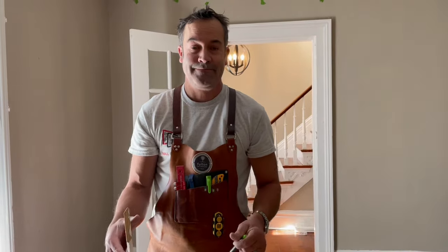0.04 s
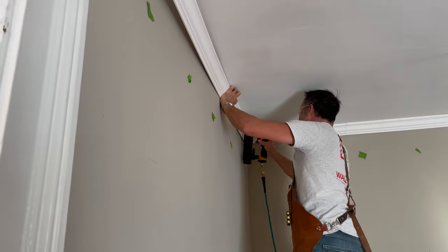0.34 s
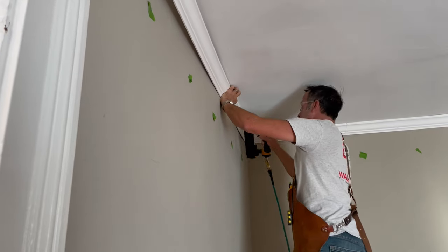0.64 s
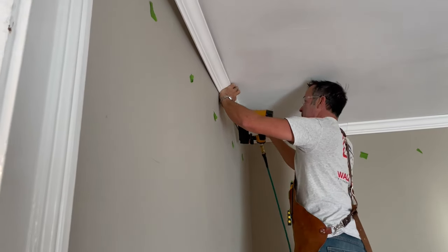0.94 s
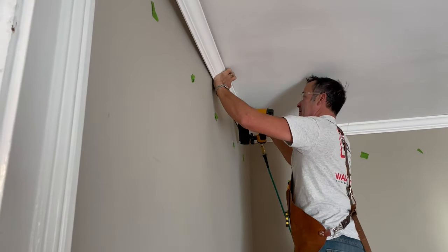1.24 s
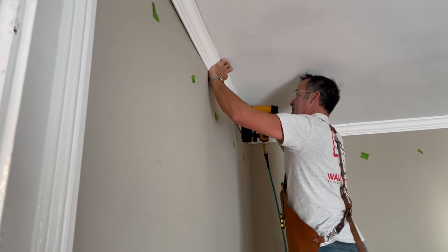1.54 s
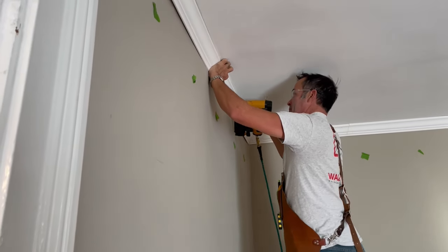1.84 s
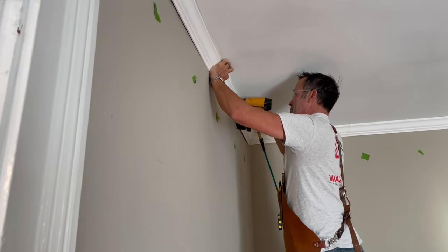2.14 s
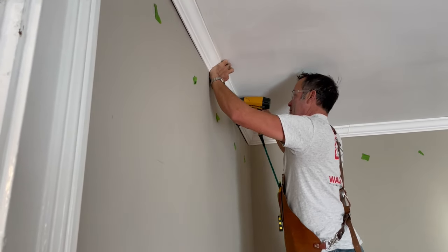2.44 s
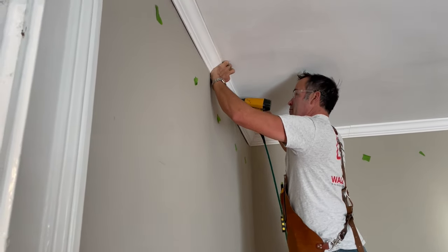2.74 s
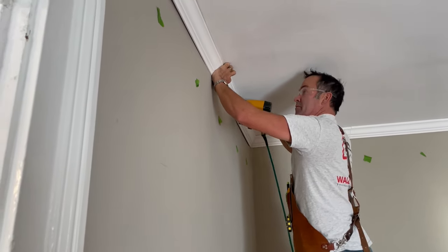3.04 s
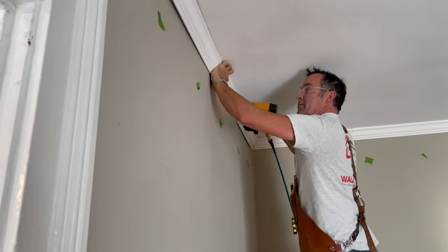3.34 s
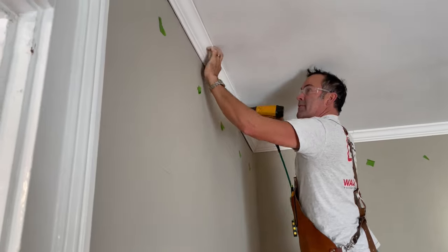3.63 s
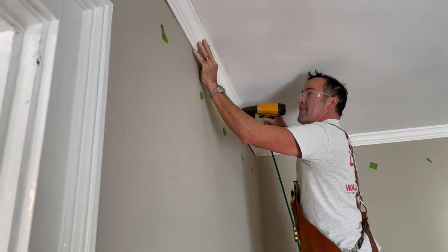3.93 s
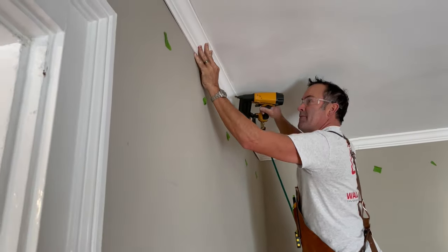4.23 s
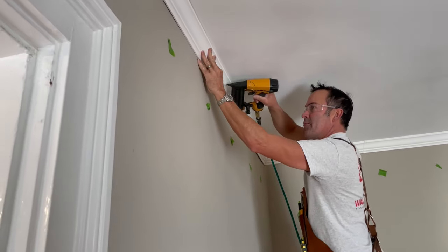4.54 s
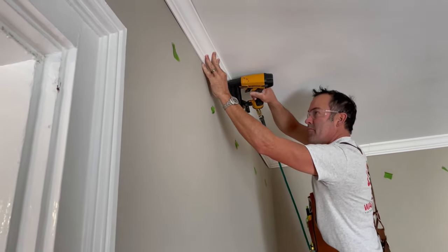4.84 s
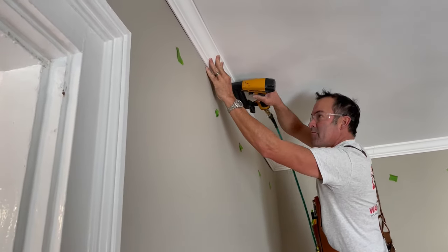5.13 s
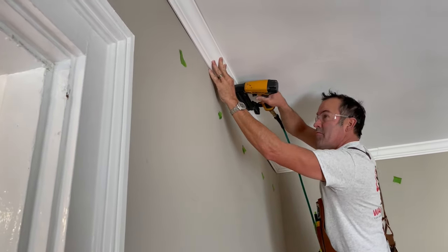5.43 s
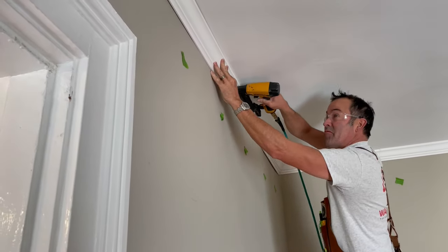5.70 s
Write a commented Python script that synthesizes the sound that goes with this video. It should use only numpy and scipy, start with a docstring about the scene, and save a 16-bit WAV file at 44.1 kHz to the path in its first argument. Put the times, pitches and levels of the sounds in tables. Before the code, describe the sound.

A pneumatic nail gun fires three sharp shots in an echoing room, with wooden knocks and small metal clicks between them.

```python
"""A bare, echoing room, where a pneumatic nail gun fixes crown moulding over a low building rumble.
Three shots: air slams the piston down, the driver hits the nail, the piston clacks back with a puff.
Between shots the trim is knocked into place, fittings click, the gun's nose scrapes along the wood
and air hisses back through the hose. A gain control ducks each shot and swells back during its echo."""
import sys
import numpy as np
from scipy import signal
from scipy.fft import rfft, irfft, next_fast_len
from scipy.io import wavfile
from scipy.ndimage import uniform_filter1d, minimum_filter1d, map_coordinates

SR = 44100
rng = np.random.default_rng(int(sys.argv[2]) if len(sys.argv) > 2 else 0)


def log_audio(samples):
    """Write samples as a 16-bit WAV file to the path given in sys.argv[1]."""
    # one column per channel
    frames = np.atleast_2d(samples).T
    # limit to full scale, then quantise
    limited = np.clip(frames, -1, 1)
    pcm = np.round(limited * 32767).astype(np.int16)
    wavfile.write(sys.argv[1], SR, pcm)


N = 254368
LENGTH = 65536  # samples in one hit, tail included
T, HZ = np.arange(LENGTH) / SR, np.fft.rfftfreq(LENGTH, 1 / SR)
# the bright crack of escaping air: f/Hz, level/dB
CRACK_SPECTRUM = [(300, -20), (1500, 0.5), (3500, -6), (7000, -7), (11000, 3), (16000, -1)]


def amp(db):
    """Decibels to gain."""
    return 10 ** (np.asarray(db) / 20)


def unit(x):
    """Scale to rms 1."""
    return x / np.sqrt(np.mean(np.abs(x) ** 2) + 1e-20)


def along(points, hz):
    """Read a curve of (f/Hz, value) points on a log frequency axis."""
    freqs, values = np.transpose(points)
    return np.interp(np.log(hz + 1), np.log(freqs), values)


def add(track, s, sound):
    """Mix a stereo sound into the track at s seconds."""
    part = track[:, max(round(s * SR), 0):][:, :sound.shape[1]]
    part += sound[:, :part.shape[1]]


def filtered(x, response):
    """Filter x by a gain given as a function of frequency."""
    size = next_fast_len(x.shape[-1] + 4096, real=True)
    return irfft(rfft(x, size) * response(np.fft.rfftfreq(size, 1 / SR)), size)[..., :x.shape[-1]]


def shape(points):
    """An EQ curve that keeps white noise at rms 1."""
    return unit(amp(along(points, HZ)))


def coloured(x, gain):
    """Minimum-phase EQ, so that attacks stay sharp."""
    cepstrum = irfft(np.log(np.maximum(gain, 1e-6)))
    cepstrum[1:LENGTH // 2] *= 2
    cepstrum[LENGTH // 2 + 1:] = 0
    return irfft(rfft(x) * np.exp(rfft(cepstrum)))


def resonance(hz, centre_hz, quality):
    """Gain of one resonance, 1 at its centre."""
    return 1 / np.hypot(1, quality * ((hz + 1) / centre_hz - centre_hz / (hz + 1)))


def fade(t60):
    """Exponential decay by 60 dB in t60 seconds."""
    return np.exp(-np.log(1000) * T / t60)


def attack(build_s):
    """A soft onset with time constant build_s."""
    return 1 - np.exp(-T / build_s)


def burst(t60):
    """A short crack of noise."""
    return rng.standard_normal(LENGTH) * fade(t60)


def glide(start_hz, end_hz, fall_s):
    """A tone whose pitch falls: high bending waves outrun low ones."""
    return np.sin(2 * np.pi * np.cumsum(end_hz + (start_hz - end_hz) * np.exp(-T / fall_s)) / SR)


def swells(cues, rise, sag, release):
    """Envelope of events that rise, sag while they last and die away; slopes in dB/s."""
    t = np.arange(N) / SR
    return sum(amp(db - rise * np.maximum(s - t, 0)
                   - sag * np.clip(t - s, 0, length)
                   - release * np.maximum(t - s - length, 0)) for s, db, length in cues)


def direct(x):
    """Sound straight from the work reaches the left side 34 microseconds late."""
    return filtered(x, lambda hz: np.array([np.exp(-2j * np.pi * hz * 34e-6), np.ones_like(hz)]))


def diffuse(size):
    """White noise from all sides: near mono in the bass, wide above."""
    # likeness of left and right in the room: f/Hz, correlation
    likeness = [(60, 0.97), (130, 0.97), (290, 0.8), (640, 0.0086), (1400, 0.076), (3100, 0.31), (7000, 0),
                (15000, 0)]

    def mid_side(hz):
        angle = np.arccos(np.clip(along(likeness, hz), -1, 1)) / 2
        return np.array([np.cos(angle), np.sin(angle)])

    mid, side = filtered(rng.standard_normal((2, size)), mid_side)
    return np.array([mid + side, mid - side])


def echo(build_s):
    """A fresh room tail that builds up, then dies fastest in the treble."""
    # reverb time of the bare room: f/Hz, t60/s
    reverb_times = [(60, 0.84), (130, 0.5), (250, 0.95), (700, 1), (1500, 0.9517), (3000, 0.8358),
                    (6000, 0.7), (10000, .5), (15000, 0.42)]
    hz, t, spectra = signal.stft(diffuse(LENGTH), SR, nperseg=512)
    decay = np.exp(-np.log(1000) * t / along(reverb_times, hz)[:, None])
    tail = signal.istft(spectra * decay, SR, nperseg=512)[1]
    return tail[:, :LENGTH] * attack(build_s)


def building_rumble():
    """The building's low bed of noise, steady but for a slow wander in level."""
    # rumble spectrum: f/Hz, level/dB
    spectrum = [(20, -24.5), (48, -3.5), (62, -8.5), (83, -2.5), (110, -12), (160, -11), (300, -13),
                (600, -15), (1300, -23), (2500, -36), (5000, -49), (15000, -57)]
    level_db, wander_db, wanders_per_s = -53, 0.44, 2.7
    knots = np.arange(N) * wanders_per_s / SR
    wander = map_coordinates(rng.standard_normal(64), [knots], mode="mirror")
    rumble = unit(filtered(diffuse(N), lambda hz: amp(along(spectrum, hz))))
    return amp(level_db + wander_db * wander) * rumble


def nose_slide():
    """A faint scrape along the trim, sung by one resonance of the gun's nose."""
    # slides: t/s at full speed, level/dB, length/s
    cues = [(3.5, -62.5, 0.54), (4.3, -71, 0.2)]
    scrape = unit(filtered(diffuse(N), lambda hz: resonance(hz, centre_hz=3670, quality=8.3)))
    return swells(cues, rise=100, sag=14, release=85) * scrape


def hose_refill():
    """The hose recharges the gun: a soft hiss opens, sags as the pressure evens out, then shuts."""
    # refills: t/s at full flow, level/dB, length/s
    cues = [(.855, -42, 0.38), (3.49, -46, 0.2)]
    # air in the hose: f/Hz, level/dB
    spectrum = [(200, -1), (500, -1), (800, 5.5), (1100, 6), (1500, 12.5), (2500, 4), (4000, 0.5),
                (7000, -5.5), (11000, -5.5), (14000, -13.5), (16000, -13)]
    hiss = unit(filtered(diffuse(N), lambda hz: amp(along(spectrum, hz))))
    return swells(cues, rise=98, sag=11, release=62) * hiss


def metal_clicks():
    """The trigger and fittings make small metal contacts: a midrange ring and a thin snap."""
    # clicks: t/s, ring/dB, snap/dB
    cues = [(0.079, -44.5, -64), (1.912, -29.5, -44.5), (2.207, -44, -40.5), (2.277, -32.5, -45),
            (2.2969, -18, -56.5), (3.168, -50, -32), (3.931, -48, -57), (3.945, -51.5, -51),
            (4.512, -63.5, -65), (4.733, -30, -44.5), (5.007, -55, -57), (5.256, -60, -69)]
    ring = shape([(400, -30), (1500, 4.5), (2700, -2), (3400, -4), (4200, -15.5),
                  (9000, -27.5), (16000, -32)])
    snap = shape([(1500, -24), (6000, -3.5), (11000, -0.5), (16000, -11)])
    out = np.zeros((2, N))
    for s, ring_db, snap_db in cues:
        contact = amp(-2.5) * direct(burst(t60=0.031)) + amp(-16) * echo(build_s=0.0022)
        add(out, s, coloured(contact, amp(ring_db) * ring + amp(snap_db) * snap))
    return out


def bending_wave(delay_s):
    """A sharp blow smeared by the wall: low bending waves arrive last (delay_s holds at 1 kHz)."""
    travel_cycles = 2 * delay_s * np.sqrt(1000 * HZ)
    return irfft(np.exp(-2j * np.pi * travel_cycles)) * (T < T[-1] / 2)


def wood_ring():
    """Trim and wall ring on, with fresh strengths and phases for every knock."""
    # modes of the trim and wall: f/Hz, level/dB, t60/s
    modes = [(135.7, -5.5, 2), (296, 5, 0.27), (319, 5, 0.73), (386, -0.5, 1.5), (492, 3, 0.29),
             (586, -13, 3.3), (723, -9, 2.2), (815, -3.5, 0.6), (940, -1.5, 0.72)]
    ring = np.zeros((2, LENGTH))
    for hz, db, t60 in modes:
        envelope = amp(db + rng.normal(0, 1.6)) * fade(t60)
        phase = rng.random() + min(hz / 2000, 1) * rng.random((2, 1))  # higher modes spread wider
        ring += envelope * np.sin(2 * np.pi * (hz * T + phase))
    return ring * attack(build_s=0.0086)


def trim_knocks():
    """Fist and gun nose bump the trim: soft blows are dull, hard ones bright."""
    # knocks: t/s, level/dB, hardness/dB, f/Hz of the struck spot
    cues = [(1.304, -39.5, 5, 1080), (1.545, -16.5, 3.5, 300), (1.574, -15.5, -11.5, 790),
            (2.129, -24, 2.5, 294), (2.208, -24, -10, 1370), (2.296, -26.5, -9, 1700),
            (2.311, -43, -19.5, 136.2), (2.7284, -27.5, 2.5, 302), (3.624, -39.5, -14, 283),
            (4.018, -35.5, -1.5, 285), (4.347, -42.5, -2.5, 288.6), (4.656, -62.5, -33, 301),
            (4.722, -35, -4, 582), (4.733, -26, 4, 1540), (4.795, -25.5, -4.5, 1090)]
    # tone of the struck trim: f/Hz, level/dB
    trim_spectrum = [(29, -37.5), (50, -6), (75, 2.5), (165, -4), (314, -2.5), (494, 0), (643, -9),
                     (856, -4), (1750, -13), (2450, -18.5), (3670, -32.5), (5910, -40), (8460, -45.5),
                     (10700, -52.5), (15000, -59.5)]
    open_span_hz, spot_boost_db = 280, 14
    above_bass, treble = (1 / (1 + (edge_hz / (HZ + 1)) ** 6) for edge_hz in (600, 3000))
    bands = [1 - above_bass, above_bass * (1 - treble), treble]
    out = np.zeros((2, N))
    for s, level_db, hard_db, spot_hz in cues:
        # stiff spots ring higher, thinner and drier than the open span
        octaves = np.log2(spot_hz / open_span_hz)
        bass_db = level_db - 1 - 5 * octaves - 0.38 * hard_db
        treble_db = level_db - 16 + hard_db
        room_db = -3 - 3.5 * octaves
        spot = shape(trim_spectrum) * (1 + amp(spot_boost_db) * resonance(HZ, spot_hz, quality=2.1))
        colour = sum(amp(db) * unit(spot * band)
                     for db, band in zip((bass_db, level_db, treble_db), bands))
        contact = amp(16) * bending_wave(delay_s=0.0017) + amp(-2.5) * burst(t60=0.091)
        blow = direct(contact) + amp(room_db) * echo(build_s=0.0094)
        hollow = amp(bass_db + room_db - 8.5) * wood_ring()
        snap = amp(treble_db - 1.5) * direct(coloured(burst(t60=0.002), shape(CRACK_SPECTRUM)))
        add(out, s, coloured(blow, colour) + hollow + snap)
    return out


def piston_return(metal, clack_db, vent_db):
    """The piston rattles home, the room answers and the spent air puffs out."""
    # piston bounces: delay/s, level/dB
    bounces = [(0, -1), (.0065, 1.5), (0.014, -4.5)]
    # spectra of the clack and of the vented air: f/Hz, level/dB
    clack_spectrum = [(40, -9.5), (130, 3.5), (220, -4.5), (500, -5.5), (1000, -2.5), (1700, 0), (2600, -3),
                      (4000, -13), (8000, -17), (16000, -19)]
    vent_spectrum = [(300, -42), (1500, 11), (3500, -12.5), (7000, 1.5), (11000, 8), (14000, -12.5),
                     (16000, -2)]
    rattle = np.zeros((2, LENGTH))
    for delay_s, db in bounces:
        add(rattle, delay_s, amp(db - 20) * coloured(direct(burst(t60=0.017)), shape(clack_spectrum)))
    room = amp(-26) * coloured(echo(build_s=0.0052), shape(clack_spectrum) * metal)
    puff = amp(-24) * coloured(echo(build_s=0.035) * fade(0.45), shape(vent_spectrum))
    return amp(clack_db) * rattle + amp(vent_db) * (room + puff)


def air_charge(thump_db):
    """The charge fires: a falling thump under a spit of air."""
    thump = amp(thump_db - 5.5) * glide(start_hz=1098, end_hz=128.5, fall_s=0.0025) * fade(0.056)
    spit = amp(-11.5) * coloured(burst(t60=0.079), shape(CRACK_SPECTRUM))
    return direct(thump + spit)


def driver_strike(metal, recoil_db, room_db):
    """The driver hits the nail: the gun clangs and kicks, and the whole room is set ringing."""
    # the blast in the room: f/Hz, level/dB
    blast_spectrum = [(35, -14), (75, -2), (110, -8.5), (160, -9), (450, -1.5), (800, -4), (1150, -5),
                      (1480, -1), (1900, -4), (2800, -9.5), (3500, -8.5), (5000, -14.5), (8000, -18.5),
                      (12000, -19.5), (16000, -29.5)]
    strike = amp(-2) * glide(start_hz=4790, end_hz=1387, fall_s=0.00079) * fade(0.032)
    crack = amp(-3.5) * coloured(burst(t60=0.0073), shape(CRACK_SPECTRUM))
    kick = glide(start_hz=160, end_hz=61.5, fall_s=0.0065)
    recoil = amp(recoil_db) * kick * fade(0.031) * attack(build_s=0.002)
    room = amp(room_db - 22) * coloured(echo(build_s=0.001), shape(blast_spectrum) * metal)
    exhaust = amp(-32) * coloured(echo(build_s=0.004) * fade(0.35), shape(CRACK_SPECTRUM))
    clang = amp(-24) * coloured(burst(t60=0.09), unit((metal - 1) ** 2))
    return direct(strike + crack + clang + recoil) + room + exhaust


def nail_gun():
    """Each shot is three hits: the air charge, the driver milliseconds later, the piston's return."""
    # shots: t/s, level/dB, thump/dB, recoil/dB, driver delay/s, room/dB, return t/s, clack/dB, vent/dB
    cues = [(.097, 17.5, -15.5, -16, 0.0068, -2.5, .2067, 4, 1.6),
            (2.766, 12.5, 2.5, -14, .0071, 5.5, 2.889, 6, 1),
            (5.4875, 1, 2, -3.5, .0079, 2.2, 5.616, 1.5, 1.5)]
    # resonances of the gun's metal body: f/Hz, quality, level/dB
    body_modes = [(1450, 14, -4), (2211, 60, -5), (3400, 45, -4), (3965, 90, -4), (4126, 90, -5),
                  (4680, 90, -4)]
    metal = 1 + sum(amp(db) * resonance(HZ, hz, quality) for hz, quality, db in body_modes)
    out = np.zeros((2, N))
    for s, db, thump_db, recoil_db, delay_s, room_db, return_s, clack_db, vent_db in cues:
        add(out, s, amp(db) * air_charge(thump_db))
        add(out, s + delay_s, amp(db) * driver_strike(metal, recoil_db, room_db))
        add(out, return_s, amp(db) * piston_return(metal, clack_db, vent_db))
    return out


def scene():
    """All the work sits a little to the right."""
    # stereo balance: f/Hz, left minus right/dB
    balance = [(100, 0.5), (380, -1.4), (700, -6), (1300, -2.5), (2400, -2), (5000, -1.5), (12000, 0)]
    mix = nail_gun() + trim_knocks() + metal_clicks() + hose_refill() + nose_slide() + building_rumble()
    return filtered(mix, lambda hz: amp(np.outer([.5, -.5], along(balance, hz))))


def gain_control(x, limit_db, hold_s, recovery_db_per_s, ahead_s):
    """Duck at once when the sound passes the limit, hold, then swell back steadily."""
    power = np.abs(uniform_filter1d(np.mean(x ** 2, axis=0), size=600))
    duck_db = np.minimum(limit_db - 10 * np.log10(power + 1e-12), 0)
    span, lead = int(hold_s * SR) + 1, int(ahead_s * SR) + 1
    held = minimum_filter1d(duck_db, span, origin=(span - 1) // 2, mode="constant")
    ramp = recovery_db_per_s * np.arange(N) / SR
    gain_db = np.minimum.accumulate(held - ramp) + ramp
    return x * amp(uniform_filter1d(minimum_filter1d(gain_db, lead), lead))


def record(dry):
    """Microphone colour, gain control, rounded peaks, a brief dip on the first shot and a high cut."""
    # microphone colour: f/Hz, gain/dB
    microphone = [(4000, -2), (7000, 2.5), (8400, -10), (9600, 1.5), (12000, 2.5), (13300, -7), (14600, 1),
                  (16000, -7.5)]
    ceiling, top_hz = 0.76, 15950
    x = filtered(dry, lambda hz: amp(along(microphone, hz)))
    x = gain_control(x, limit_db=-9, hold_s=0.21, recovery_db_per_s=61.5, ahead_s=0.008)
    x = x / (1 + (x / ceiling) ** 6) ** (1 / 6)
    dip_db = np.interp(np.arange(N) / SR, [.086, .09, .122, .13, .15], [0, -70, -60, -13, 0])
    return filtered(x * amp(dip_db), lambda hz: 1 / (1 + (hz / top_hz) ** 120))


dry = scene()
out = record(dry)
log_audio(out)
```